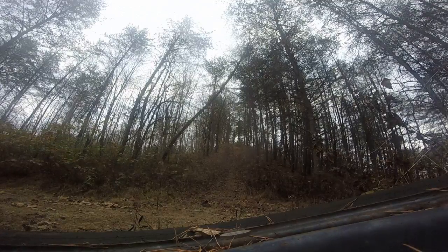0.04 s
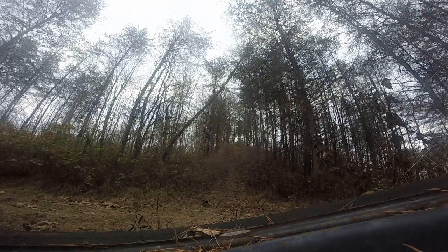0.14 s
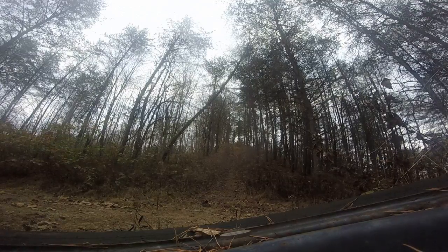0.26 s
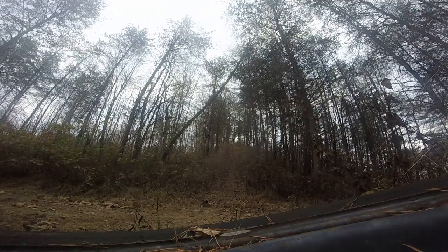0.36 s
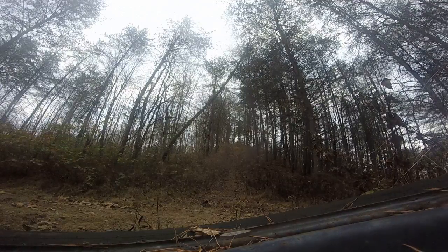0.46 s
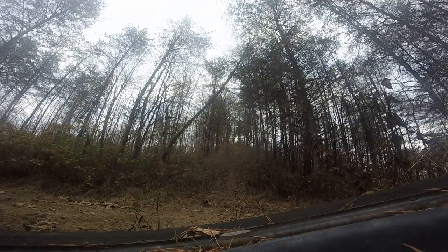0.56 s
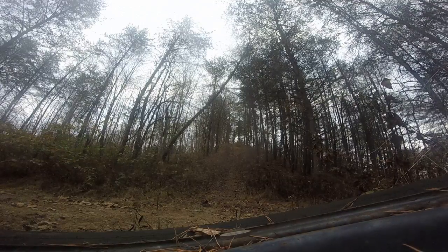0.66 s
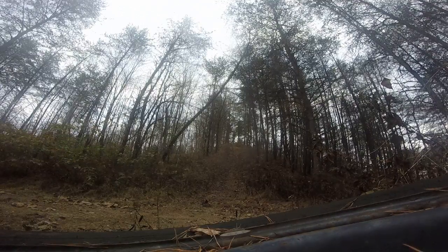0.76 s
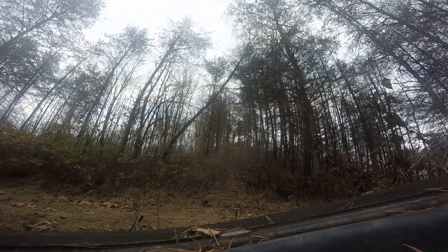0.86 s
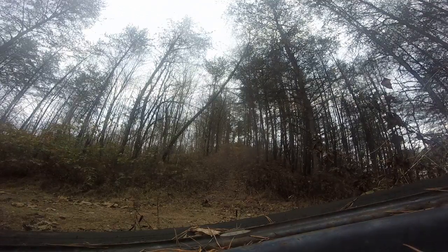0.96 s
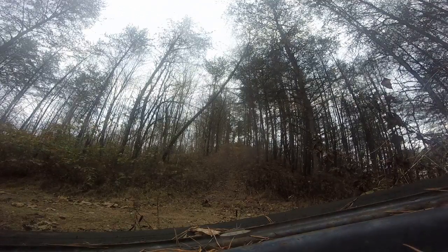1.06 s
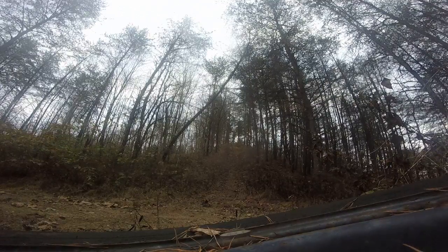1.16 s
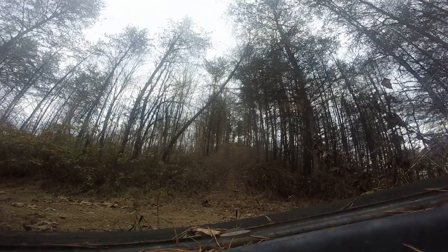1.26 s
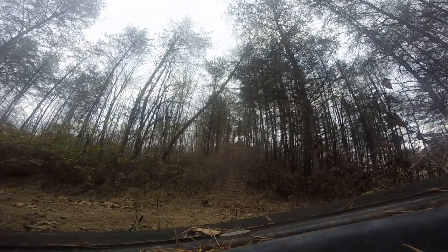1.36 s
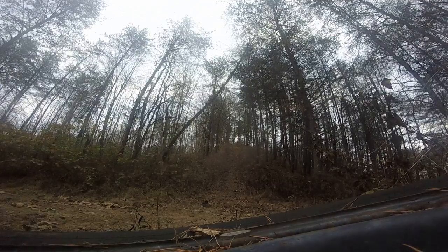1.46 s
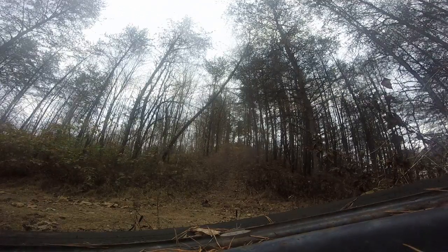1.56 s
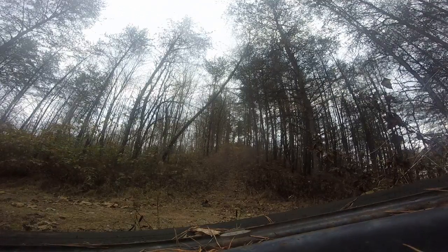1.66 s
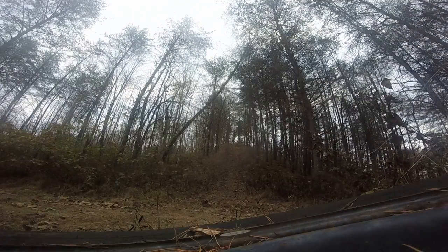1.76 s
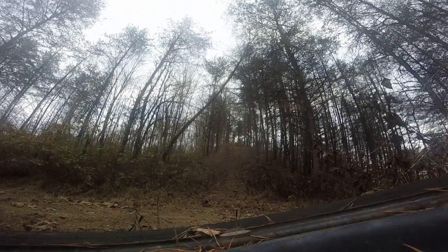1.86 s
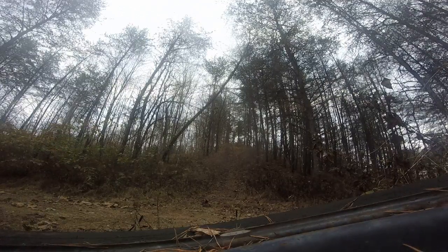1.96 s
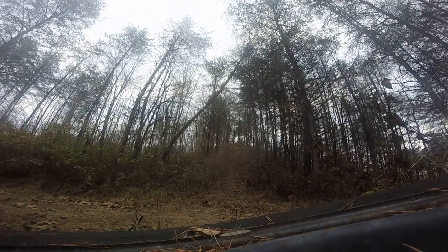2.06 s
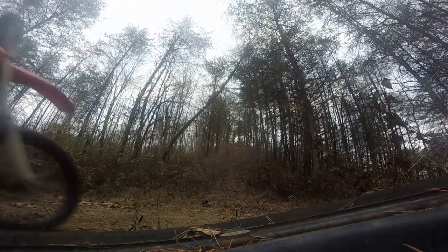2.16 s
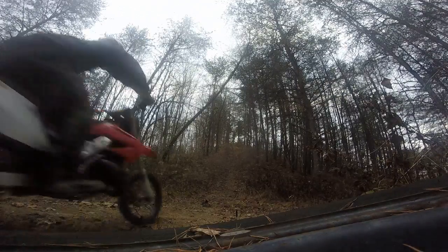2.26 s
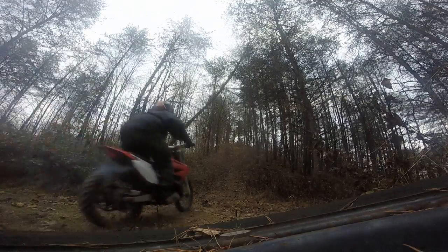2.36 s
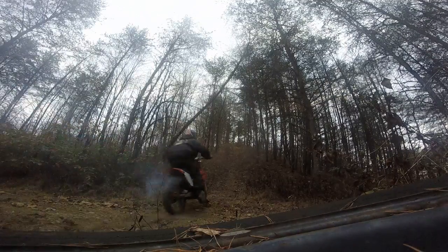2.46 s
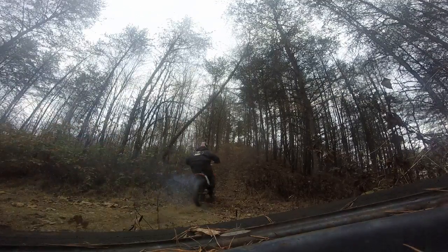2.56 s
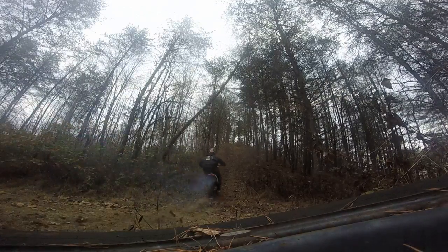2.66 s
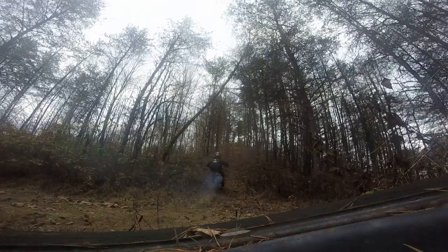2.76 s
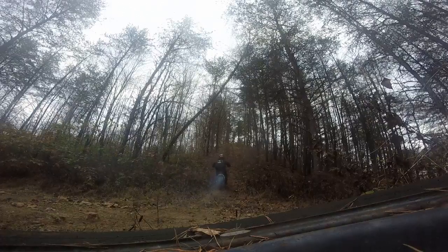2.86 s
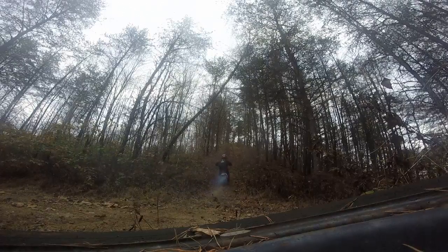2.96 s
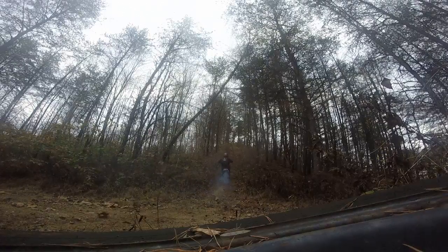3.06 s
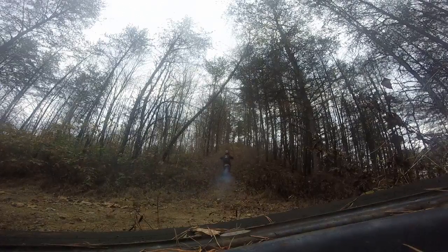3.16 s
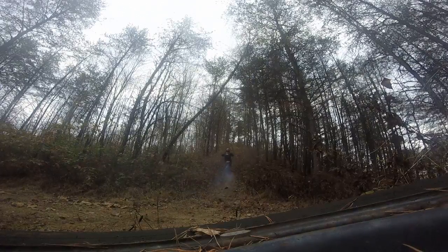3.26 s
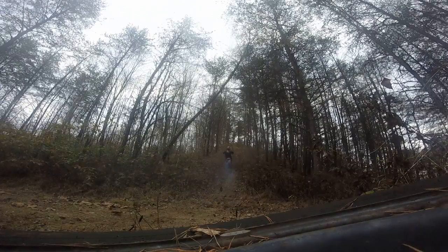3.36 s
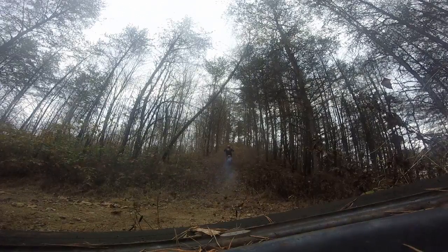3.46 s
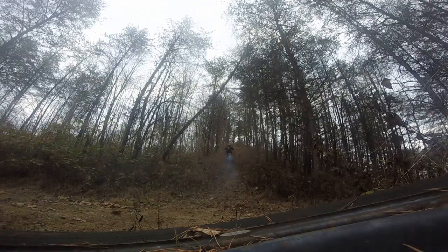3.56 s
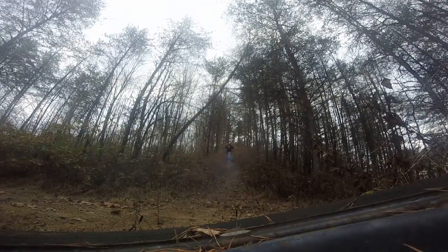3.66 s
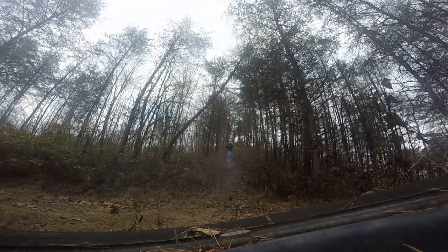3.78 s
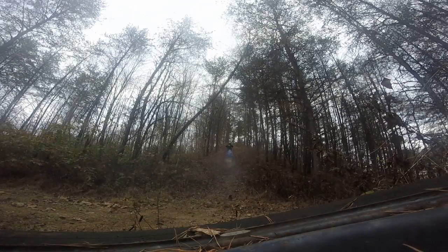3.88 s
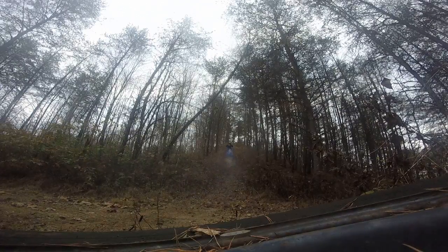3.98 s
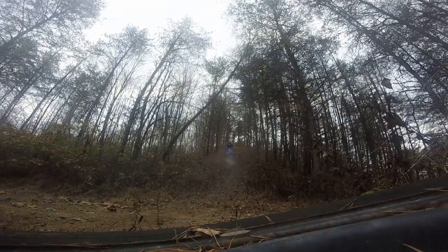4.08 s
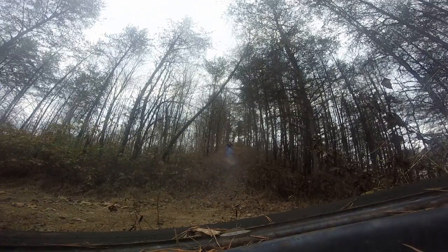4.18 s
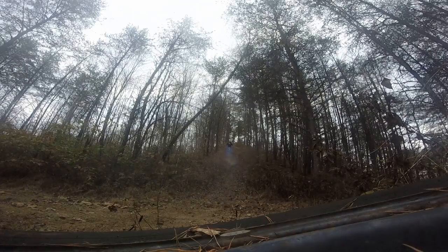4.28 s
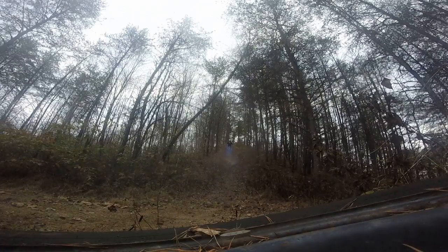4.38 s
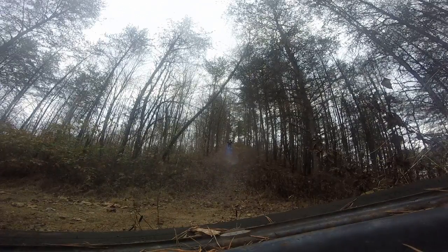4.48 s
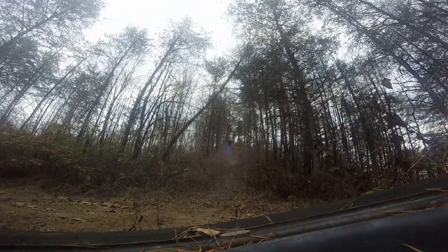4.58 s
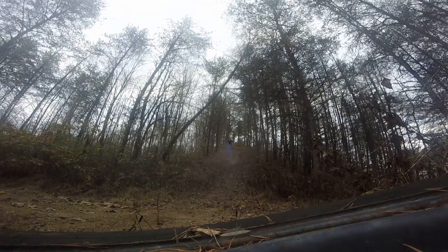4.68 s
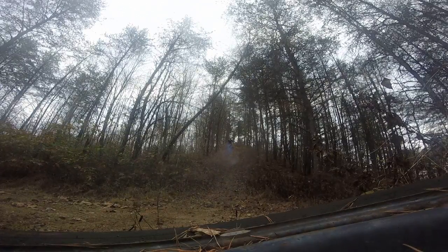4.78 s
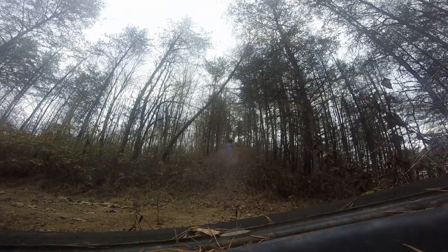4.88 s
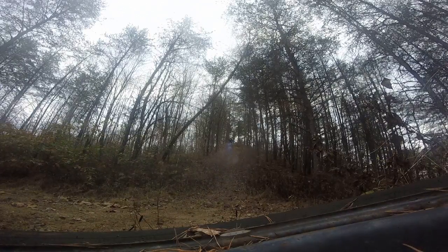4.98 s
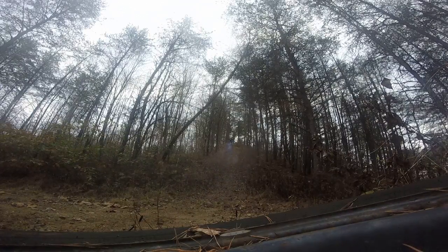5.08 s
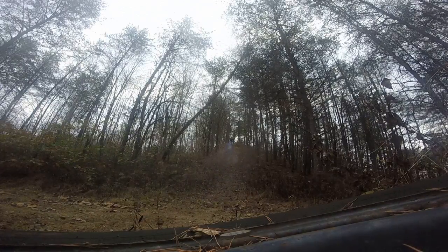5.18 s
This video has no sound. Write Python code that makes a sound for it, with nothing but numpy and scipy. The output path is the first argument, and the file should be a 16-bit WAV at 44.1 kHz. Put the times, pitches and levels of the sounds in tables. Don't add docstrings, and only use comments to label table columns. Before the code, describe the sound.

Faint engine buzz swells suddenly into a harsh, raspy dirt bike pass, then flickers between trees as it rides off, still screaming.

```python
import sys
import numpy as np
from scipy import signal
from scipy.fft import rfft, irfft, next_fast_len
from scipy.io import wavfile
from scipy.ndimage import uniform_filter1d, map_coordinates

SR = 44100
rng = np.random.default_rng(int(sys.argv[2]) if len(sys.argv) > 2 else 0)


def volts(x):
    e = np.asarray(x, float) / 20
    return 10 ** e


def transcribe(signal):
    frames = np.atleast_2d(signal).T
    limited = np.clip(frames, -1, 1)
    pcm = np.round(limited * 32767).astype(np.int16)
    wavfile.write(sys.argv[1], SR, pcm)


N = 230622

DRONE_HZ, RASP_HZ = 780, 2000
SLOPE_S = 3.1


def bike():
    # start_s, bark_db, hiss_db (gas hiss over the bark)
    loudness = [(0, -52, -17.5), (.25, -49, -16.5), (.64, -57, -12), (1.14, -48, -15), (1.53, -43.5, -11),
                (1.68, -37.5, -11), (1.72, -36, -4), (1.9, -27.5, -8), (2.09, -17, -17.5), (2.3, -17, -24),
                (2.355, -25, -17), (2.5, -22.5, -20), (2.72, -24.5, -24.5), (3.45, -28, -21.5),
                (3.77, -28, -21), (3.82, -33, -21.5), (4.75, -30, -23), (5.23, -33.5, -23)]
    # start_s, gas_share (0-1 of the bark), scatter_db (from trunks)
    roughness = [(0, .6, -4), (1.6, .5, -6), (2, .25, -9), (2.3, .22, -9), (2.45, .07, -16),
                 (2.8, .08, -15), (3.75, .14, -11), (3.9, .33, -2), (5.23, .36, -1)]
    # peak_s, length_s, lift_db
    bite = (2.372, .02, 5.5)
    # peak_s, length_s, lift_db
    shut = (2.348, .026, -4.5)
    # peak_s, length_s, lift_db
    gaps = [(2.17, 0.098, 2.5), (2.57, 0.073, 4), (2.674, 0.045, 0), (3.058, 0.011, 6), (3.194, 0.041, 3),
            (3.34, 0.24, 4), (3.463, 0.051, 3), (4.023, 0.029, 5), (4.098, 0.064, 3.5), (4.157, 0.066, 2.5),
            (4.34, 0.094, 3), (4.443, 0.016, 3.5), (4.576, 0.067, 1.5), (4.663, 0.13, 3),
            (4.772, 0.042, 1.5), (4.808, 0.042, 3), (1.933, 0.032, 3), (2.052, 0.024, 2),
            (2.247, 0.15, 2.5), (2.455, 0.017, 4.5), (2.62, 0.032, 1.5), (3.08, 0.022, 0),
            (3.686, 0.099, 1.5), (3.86, 0.046, 2), (3.96, 0.026, -0.5), (4.504, 0.023, 1.5),
            (4.894, 0.088, 3), (4.965, 0.024, 2), (5.072, 0.027, 1), (5.138, 0.035, 2), (5.04, 0.018, 1.5),
            (5.195, 0.055, 1.5), (4.26, 0.048, 1.5), (3.408, 0.017, 2), (3.95, 0.022, 3)]
    # centre_hz, width_hz, peak_s, length_s, lift_db
    slot = [
        (4760, 330, 2.6, 0.59, -4),
        (5700, 900, 2.55, 0.09, 3),
        (5700, 900, 2.66, .1, -2),
        (12500, 3000, 2.13, .1, 2),
        (12500, 4000, 2.28, .12, -3),
    ]

    near, rear, far = after(1.6, 0.14), after(2.35, .02), after(3.8, .02)
    bark_db, hiss_db = curves(loudness)
    bark_db = bark_db + glimpses([bite])
    gas_share, wet_db = curves(roughness)
    open_db, shut_db = glimpses(gaps), glimpses([shut])
    hiss_db = hiss_db + 7.5 * (after(2.055, 0.016) - rear) + shut_db

    turns = np.cumsum(revs()) / SR
    blows, gas = exhaust(turns, gas_share)
    blows = wood(echoes(blows), wet_db)
    low, high = housing(blows, gas, near, rear, far)
    body = drone(low, gas, rear, far) + bark(low, rear, open_db) * volts(open_db)
    treble = rasp(high, hiss_db + 0, rear, shut_db, open_db)
    treble = treble + hiss(gas + (0.37 + 0.35 * (rear - far)) * blows, hiss_db, open_db)
    engine = volts(bark_db) * (body + shade(treble, slot))
    return pipe_tone(turns) + whine(turns) + engine + wheels(bark_db)


def revs():
    # start_s, firing_hz
    speed = [(0, 98.4), (.2, 115), (.35, 106), (.72, 87), (.75, 81.5), (.86, 82.5), (1.19, 99.5),
             (1.32, 107), (1.58, 108.5), (1.8, 129), (2.52, 133), (3.2, 141), (3.31, 151), (3.62, 147),
             (3.79, 170), (3.85, 132), (4.57, 133), (4.7, 144)]
    # peak_s, slip_s, grip_s, extra_hz (below 0
    slips = [(1.272, 0.08, 0.05, 8), (1.45, 0.12, 0.12, 4), (1.626, 0.045, 0.1, 6.5),
             (1.717, 0.04, 0.09, 15.5), (1.857, 0.025, 0.025, -6.0), (1.886, 0.025, 0.09, 9.0),
             (2.016, 0.09, 0.04, -5.5), (2.096, 0.025, 0.06, 14.5), (2.226, 0.025, 0.025, 3.0),
             (2.325, 0.09, 0.04, 23.0), (2.495, 0.04, 0.025, 4.5), (2.525, 0.025, 0.025, -4.5),
             (2.565, 0.025, 0.09, 4.0), (2.665, 0.025, 0.025, -4.5), (2.705, 0.18, 0.09, 10.5),
             (2.755, 0.025, 0.025, 3.0), (2.794, 0.025, 0.025, -5.0), (2.864, 0.04, 0.04, 8.5),
             (2.904, 0.18, 0.18, 9.0), (3.034, 0.09, 0.025, 3.0), (3.054, 0.04, 0.04, 14.0),
             (3.124, 0.06, 0.025, -3.5), (3.154, 0.025, 0.025, 3.5), (3.363, 0.09, 0.025, 4.5),
             (3.413, 0.025, 0.025, 4.0), (3.433, 0.025, 0.025, -6.0), (3.473, 0.025, 0.13, 6.0),
             (3.473, 0.04, 0.025, 4.5), (3.583, 0.04, 0.025, 6.0), (3.613, 0.025, 0.025, -6.5),
             (3.692, 0.06, 0.09, 13.0), (3.762, 0.025, 0.04, 3.0), (3.852, 0.025, 0.025, -3.5),
             (3.892, 0.025, 0.13, 6.5), (3.992, 0.025, 0.025, 3.0), (4.062, 0.025, 0.025, -4.5),
             (4.111, 0.04, 0.04, 15.0), (4.201, 0.025, 0.18, 3.0), (4.361, 0.04, 0.025, 11.5),
             (4.411, 0.025, 0.025, -3.5), (4.441, 0.025, 0.13, 5.5), (4.511, 0.025, 0.04, 3.5),
             (4.61, 0.025, 0.025, 7.5), (4.71, 0.025, 0.04, 3.5), (4.75, 0.025, 0.06, -6.0),
             (4.83, 0.025, 0.06, 10.0), (4.93, 0.025, 0.04, -3.0), (4.989, 0.025, 0.09, 5.5),
             (5.159, 0.04, 0.04, -13.5)]
    t = np.arange(N) / SR
    hz = curves(speed)[0]
    for s, slip, grip, extra in slips:
        hz = hz + np.interp(t, (s - slip, s, s + grip), (0, extra, 0))
    return hz * (1 + .005 * walk(60))


def pipe_tone(turns):
    tone = 0
    for k, db in enumerate(partials()):
        delay = np.pi / 2 * k ** 2
        phase = 2 * np.pi * (k + 1) * turns + delay + .12 * (k + 1) * walk(70)
        tone = tone + np.sqrt(2) * volts(db + 1.3 * walk(90)) * np.sin(phase)
    return tone


def partials():
    # start_s, level_db, lean_db (firing rate over its octave, set by the ground bounce)
    tone = [(0, -47.5, -14), (.3, -48, -2.5), (.5, -58, -8), (.742, -63, 7), (.752, -48.5, -8),
            (1.1, -40.5, -22), (1.3, -39, -13), (1.65, -36.5, -7), (1.76, -37.5, 16), (2.02, -33.5, 3.5),
            (2.09, -27.5, 25), (2.33, -33.5, 3), (2.39, -33, -8), (2.62, -31.5, 0), (3.4, -31, 7),
            (3.74, -33.5, 9.5), (3.84, -39.5, 0.5), (5.23, -43.5, 8)]
    # start_s, third_db, fourth_db
    upper = [(0, -66, -66), (.3, -68, -65), (.7, -73, -73), (1.5, -59, -54), (1.75, -50.5, -56),
             (1.9, -46.5, -53.5), (2.0, -52, -46.5), (2.09, -34.5, -42.5), (2.22, -44, -34),
             (2.31, -41, -42), (2.38, -54, -48), (2.45, -52, -44), (2.6, -39, -41), (3.0, -38.5, -45),
             (3.3, -43.5, -45), (3.6, -49.5, -47.5), (3.76, -55, -43), (3.84, -61, -59), (3.95, -66, -49.5),
             (4.6, -64, -50.5), (5.23, -62, -54.5)]
    tone_db, lean_db = curves(tone)
    first = 1 / (1 + volts(-2 * lean_db))
    levels_db = [tone_db + 10 * np.log10(first), tone_db + 10 * np.log10(1 - first), *curves(upper)]
    return [db + depth * 1.5 * walk(22) for db, depth in zip(levels_db, (0.4, 0.8, 1.1, 1.3))]


def whine(turns):
    # multiple (of the firing rate), peak_s, length_s, level_db, waver_db
    lines = [(9, 0.18, 0.26, -52, 3), (5, 2.21, 0.11, -31.5, 4.5), (6, 4.76, 0.57, -41.5, 2),
             (4, 1.2, 0.72, -57, 3), (7, 2.0, 0.27, -28, -0.5), (8, 2.22, 0.12, -17, -1),
             (11, 2.2, 0.064, -22, -1), (13, 2.235, .07, -21, 2), (10, 2.095, .05, -16, 0),
             (6, 2.3, 0.052, -23, -3), (9, 2.7, 0.076, -25, 2), (11, 2.63, 0.12, -29, 2),
             (9, 2.59, 0.053, -36, 1), (8, 3.055, 0.033, -17.5, 2), (8, 3.33, 0.13, -28, -2),
             (9, 3.33, 0.049, -31, 1), (7, 3.75, 0.064, -32, 4), (7, 3.55, 0.084, -35, -1),
             (6, 3.55, 0.087, -34, 2), (3, 0.777, 0.074, -51, 1), (5, 0.99, 0.52, -60, 2),
             (6, 2.7, .14, -41, 2), (7, 2.6, .09, -36, 5), (5, 4.23, 0.75, -47, 3), (5, 1.45, .3, -59.5, 6),
             (6, 1.45, .2, -57, 5.5), (7, 2.22, 0.11, -24, 3.5), (8, 2.11, 0.037, -20, 2),
             (6, 4.12, 0.11, -41, 3), (5, 3.45, .35, -43.5, 0)]
    t, out = np.arange(N) / SR, 0
    for multiple, s, length, db, waver_db in lines:
        swell = np.exp(-(2 * (t - s) / length) ** 4)
        out = out + volts(db + waver_db * walk(40)) * swell * np.sin(2 * np.pi * np.round(multiple) * turns)
    return out


def firings(turns, at, chance, jitter_s, scatter_db):
    count = int(turns[-1] - 1)
    when = np.interp(np.arange(count) + at, turns, np.arange(N)) + jitter_s * SR * chance[:count, 0]
    when = np.clip(when, 0, N - 2)
    whole = when.astype(int)
    size = volts(scatter_db * chance[:count, 1])
    out = np.zeros(N)
    np.add.at(out, whole, size * (1 - when + whole))
    np.add.at(out, whole + 1, size * (when - whole))
    return out


def exhaust(turns, gas_share):
    chance = rng.standard_normal((N // 200, 4))
    clicks = firings(turns, .3, chance[:, :2], .00003, 1.8)
    clicks = clicks + volts(-6.5) * firings(turns, .73, chance[:, 2:], .00005, 2.5)
    puff = 4.6 + np.exp(-((turns - .3) % 1) / 2.2)
    gas = level(puff * volts(1.37 * walk(60)) * rng.standard_normal(N), 0)
    return np.sqrt(1 - gas_share) * level(clicks, 0) + np.sqrt(gas_share) * gas, gas


def echoes(x):
    # delay_ms, drift_ms, level_db
    paths = [
        (1.3, .1, -14),
        (4.1, .15, -13),
        (9.5, .25, -13),
    ]
    n = np.arange(N)
    out = x
    for ms, drift, db in paths:
        late = n - (ms + drift * walk(13)) * SR / 1000
        out = out + volts(db) * map_coordinates(x, [late], order=3)
    return out


def wood(x, wet_db):
    t = np.arange(SR // 2) / SR
    trunks = rng.random((2, len(t))) < .02
    fade = volts(-60 * t / .5) * (t > .012)
    sets = rng.standard_normal((2, len(t))) * trunks * fade
    turn = 1.77 * walk(22)
    scatter = np.cos(turn) * signal.fftconvolve(x, sets[0])[:N]
    scatter = scatter + np.sin(turn) * signal.fftconvolve(x, sets[1])[:N]
    return x + volts(wet_db) * scatter * x.std() / scatter.std()


def housing(blows, gas, near, rear, far):
    # pitch_hz, level_db (per Hz)
    distant = [(350, -43), (600, -18), (800, 3), (895, 7.5), (1160, 5.5), (1440, -2), (1840, -0.5),
               (2030, -5.5), (2190, -8), (3450, -12), (4800, -25), (6240, -27), (10600, -120)]
    # pitch_hz, level_db (per Hz)
    front = [(350, -73.5), (600, 0), (655, 4), (727, -3.5), (911, 6.5), (1070, 5), (1250, -4.5), (1730, -6),
             (2030, -9.5), (2520, -11), (2750, -13.5), (3480, -13), (4800, -31.5), (6240, -62),
             (10600, -120)]
    # pitch_hz, level_db (per Hz)
    back = [(350, -42), (600, -18), (720, -15.5), (880, 8.5), (968, -15.5), (1270, 3.5), (1380, -0.5),
            (1590, -1.5), (1940, -11.5), (2140, -14), (2410, -23.5), (3730, -19.5), (4800, -37.5),
            (6240, -62.5), (10600, -120)]
    # centre_hz, width_hz, lift_db
    distant_rings = [(856, 57, 2.9), (1460, 180, 1.1), (2116, 110, 9.1), (2560, 95, 4), (2960, 240, 7),
                     (3480, 115, 7.6), (4070, 140, 3.6)]
    # centre_hz, width_hz, lift_db
    front_rings = [(900, 140, 4), (1070, 90, 4), (1440, 100, 4), (1750, 160, 4), (2590, 200, 5),
                   (3050, 220, 6), (3410, 180, 6), (4150, 200, 5),
                   (959, 63, -12), (1822, 120, 7.5), (2070, 160, -8), (2380, 90, -8), (2740, 210, -5.5),
               (3230, 200, -12), (3820, 120, -10)]
    # centre_hz, width_hz, lift_db
    back_rings = [(870, 130, 2), (1088, 133, 19), (1258, 98, 3), (1600, 240, 1), (2138, 200, 10),
                  (2730, 600, 10.5), (4170, 250, 6.5), (3690, 270, 2.5), (3340, 200, -0.5), (4780, 300, -1)]
    # centre_hz, width_hz, lift_db
    far_rings = [(880, 90, -2), (1270, 120, 5), (1100, 90, -5), (2130, 100, 2)]

    poses = ((distant, distant_rings, 1 - near), (front, front_rings, near - rear),
             (back, back_rings, rear - far), (back, back_rings + far_rings, far))
    low, high = 0, 0
    for points, rings, share in poses:
        weight = np.sqrt(np.clip(share, 0, 1))
        low = low + weight * level(colour(blows, points, rings), 0)
        high = high + weight * band(colour(blows + .75 * gas, points, rings), RASP_HZ, "high")
    return low, high


def drone(low, gas, rear, far):
    # peak_s, length_s, lift_db
    dips = [
        (3.76, .16, -8),
        (2.77, 0.27, -6),
        (2.05, .15, -2),
    ]
    drone_db = -22.5 - 9.5 * rear + 13 * after(SLOPE_S, 0.15) + glimpses(dips)
    wash_db = -30 + 6.5 * (after(SLOPE_S, 0.086) - far)
    hum = steady(band(low, (600, DRONE_HZ - 20), "band"), 0.0099) * volts(drone_db)
    return hum + band(gas, (330, DRONE_HZ), "band") * volts(wash_db)


def bark(low, rear, open_db):
    # start_s, tilt_db
    balance = [(0, 1.5), (1.1, 7.5), (1.55, 2.5), (1.81, 1.5), (1.96, 4), (2.09, 5.5), (2.33, 0), (2.48, 4.5),
               (2.62, 1), (2.85, 5), (3.0, 15.5), (3.36, -5.5), (3.67, -1.5), (4.25, 4.5), (4.53, 3.5),
               (4.67, -5), (5.0, -3.5), (5.23, 4)]
    # centre_hz, width_hz, peak_s, length_s, lift_db
    shades = [(860, 85, 3.75, 0.15, -10), (1090, 110, 3.52, 0.42, -8), (1800, 130, 1.97, .12, -6),
              (1250, 110, 3.4, 0.29, 4.5), (1570, 210, 2.67, 0.18, 6.5), (1080, 200, 4.15, 0.35, -1),
              (1080, 160, 2.93, 0.23, 1.5), (1130, 160, 1.93, 0.35, -2.5), (910, 130, 1.91, 0.3, 4),
              (1090, 180, 4.7, 0.34, 5.5), (1850, 120, 2.2, .1, -5), (1670, 120, 2.1, .08, -2),
              (1200, 120, 2.22, .14, -2.5), (870, 120, 3.42, .14, -3.5), (1770, 190, 2.8, 0.13, -4)]
    tilt_db, tilt_hz = curves(balance)[0], 1410
    middle = shade(band(mirror(low, rear), (DRONE_HZ, RASP_HZ), "band"), shades)
    dull = signal.sosfilt(signal.butter(4, tilt_hz, fs=SR, output="sos"), middle)
    bright = signal.sosfilt(signal.butter(4, tilt_hz, "high", fs=SR, output="sos"), middle)
    tilted = steady(dull * volts(-tilt_db) + bright * volts(tilt_db), .05)
    return flicker(tilted, open_db) * volts(1.1 * walk(35))


def mirror(x, rear):
    t = np.arange(N) / SR
    lag_ms = .39 / np.maximum(t - 2.0, .3)
    copy = map_coordinates(x, [(t - lag_ms / 1000) * SR], order=3)
    return x + volts(-5.5) * np.clip(rear - after(2.85, .07), 0, 1) * copy


def flicker(x, open_db):
    # centre_hz, width_hz, chance_db, rate_hz, start_s, glimpse_share (extra), hidden_db
    settings = (1265, 240, 1.2, 48, 3.25, 1.3, .5)
    blinks = [3.39, 3.44, 3.5, 3.985, 4.06, 4.12, 4.205, 4.32, 4.41, 4.48, 4.54, 4.61, 4.72, 4.79, 4.865,
              4.925, 5.0, 5.06, 5.11]
    hz, width, depth_db, rate, s, share, hidden_db = settings
    ring = ring_of(x, hz, width)
    on = after(s, 0.12)
    even = steady(ring, .02) * ring.std()
    blink_db = glimpses((b, .028, -7) for b in blinks)
    ring_db = depth_db * walk(rate) + share * open_db + hidden_db + blink_db
    return x - on * ring + on * (0.31 * ring + 0.69 * even) * volts(ring_db)


def rasp(high, hiss_db, rear, shut_db, open_db):
    # centre_hz, width_hz, peak_s, length_s, lift_db
    rasp_shades = [
        (3500, 350, 2, 0.34, 4),
        (3550, 740, 2.46, 0.16, 5),
        (2400, 560, 2.45, 0.43, -4.5),
        (3100, 900, 3.6, 0.28, -1),
        (2150, 250, 2.32, 0.33, 2),
        (3000, 2000, 3.83, 0.042, 1),
        (2120, 150, 4.65, 0.12, 3),
        (3000, 270, 2.72, 0.23, 2),
        (3030, 310, 2.21, 0.11, 4),
    ]
    rasp_db = 2.5 - 4.5 * rear + 0.36 * hiss_db + 5 * after(2.92, 0.27) + shut_db
    return shade(steady(high, 0.044), rasp_shades) * volts(rasp_db + 0.45 * walk(13) + 0.45 * open_db)


def hiss(x, hiss_db, open_db):
    # pitch_hz, level_db (per Hz)
    far_behind = [(2590, -40), (4400, -17), (5220, -1), (6120, -3), (6820, 1), (7220, -4), (7960, -4),
                  (9790, -16), (12000, -31), (14400, -38), (15100, -44)]
    # pitch_hz, level_db (per Hz)
    from_behind = [(2590, -55), (4400, -21), (4630, -8), (5190, -1.5), (6120, -13.5), (6610, 2),
                   (6960, 5.5), (7410, -4), (7960, -1.5), (9100, -7.5), (10100, -14), (12800, -18.5),
                   (15100, -28)]
    # pitch_hz, level_db (per Hz)
    from_beside = [(2820, -1), (4800, -22), (5180, 3), (5620, -6), (6010, 2.5), (6620, 2), (7080, -1.5),
                   (7600, -2), (8050, 2), (9120, -5), (9710, -10.5), (12800, -13.5), (15100, -21)]
    # pitch_hz, level_db (per Hz)
    from_ahead = [(2820, -28), (4800, -16), (5210, -8), (5760, -3), (6400, -11), (7420, -17.5), (8210, -17),
                  (9120, -16.5), (9620, -30), (10600, -22), (11900, -25), (12600, -30), (15100, -38)]
    # pitch_hz, level_db (per Hz)
    from_far = [(2820, -35), (4800, 0.5), (5790, 4), (6750, 3.5), (7750, -0.5), (8610, 4.5), (9210, -1.5),
                (9710, -11.5), (10300, -7.5), (12100, -15), (13300, -13.5), (15100, -25)]
    # peak_s, length_s, lift_db
    spit = [
        (2.3, 0.1, 4),
        (2.43, 0.086, -1),
        (3.83, .06, 4.5),
        (2.14, 0.13, 2),
        (2.29, 0.073, -1),
        (3.32, .08, 3),
        (1.73, .05, 0.5),
        (1.85, 0.028, -5),
    ]
    behind, beside, ahead, far = after(0.81, 0.13), after(2.04, 0.04), after(2.36, 0.036), after(2.66, 0.03)
    poses = ((far_behind, 1 - behind), (from_behind, behind - beside), (from_beside, beside - ahead),
             (from_ahead, ahead - far), (from_far, far))
    air = 0
    for points, share in poses:
        air = air + np.sqrt(np.clip(share, 0, 1)) * band(colour(x, points), 4600, "high")
    return air * volts(hiss_db + glimpses(spit) + 0.14 * walk(24.2) + 0.43 * open_db)


def wheels(bark_db):
    return band(rng.standard_normal(N), (130, 320), "band") * volts(0.58 * bark_db - 34.0)


def grit():
    # start_s, peak_db
    ticks = [
        (1.6236, -52),
        (1.7074, -45),
        (1.8805, -38),
        (2.3614, -41),
        (2.4362, -43),
        (4.5494, -57),
    ]
    t, out = np.arange(SR // 200) / SR, np.zeros(N + SR)
    for (s, db), noise in zip(ticks, rng.standard_normal((60, len(t)))):
        start = int(s * SR)
        out[start:start + len(t)] += volts(db - 3) * noise * np.exp(-t / .0007)
    return signal.sosfilt(signal.butter(4, 9000, "high", fs=SR, output="sos"), out[:N])


def thud():
    # peak_s, length_s, level_db
    shake = (2.48, 0.47, -55)
    s, length, db = shake
    swell = np.exp(-(2 * (np.arange(N) / SR - s) / length) ** 4)
    return band(rng.standard_normal(N), (62, 100), "band") * volts(db) * swell


def rumble():
    # pitch_hz, level_db (per Hz)
    wind = [(15, -43), (28, -3), (45, -2), (100, -4.5), (250, -12), (700, -14), (2000, -37), (12500, -44),
            (15000, -52)]
    return level(colour(rng.standard_normal(N), wind) * volts(0.23 * walk(0.64)), -54.5)


def level(x, db):
    return x * volts(db) / np.sqrt(np.mean(x ** 2))


def curves(table):
    s, *columns = np.transpose(table)
    return [np.interp(np.arange(N) / SR, s, c) for c in columns]


def after(s, turn_s):
    return .5 + .5 * np.tanh((np.arange(N) / SR - s) / turn_s)


def glimpses(rows):
    t = np.arange(N) / SR
    return sum(db * np.exp(-(2 * (t - s) / length) ** 2) for s, length, db in rows)


def walk(rate):
    k = int(SR / rate)
    x = np.repeat(rng.standard_normal(N // 50)[:N // k + 1], k)
    x = uniform_filter1d(uniform_filter1d(x, k), k)[:N]
    return x / x.std()


def colour(x, points, rings=()):
    size = next_fast_len(N + SR // 4)
    hz = np.maximum(np.fft.rfftfreq(size, 1 / SR), 1)
    points_hz, points_db = np.transpose(points)
    db = np.interp(np.log(hz), np.log(points_hz), points_db)
    for f, w, lift_db in rings:
        db = db + lift_db / (1 + (2 * (hz - f) / w) ** 2)
    cepstrum = irfft(np.log(volts(db)), size)
    cepstrum[1:size // 2] *= 2
    cepstrum[size // 2 + 1:] = 0
    return irfft(rfft(x, size) * np.exp(rfft(cepstrum)), size)[:N]


def band(x, hz, kind):
    return level(signal.sosfilt(signal.butter(7, hz, kind, fs=SR, output="sos"), x), 0)


def ring_of(x, hz, width):
    edges = (hz - width / 2, hz + width / 2)
    return signal.sosfiltfilt(signal.butter(2, edges, "band", fs=SR, output="sos"), x)


def shade(x, rows):
    for hz, width, s, length, db in rows:
        x = x + ring_of(x, hz, width) * (volts(glimpses([(s, length, db)])) - 1)
    return x


def steady(x, span_s):
    k = int(span_s * SR)
    return x / np.sqrt(uniform_filter1d(uniform_filter1d(x ** 2, k), k) + 1e-9)


def scene():
    return (bike() + grit() + thud() + rumble())[None]


def band_limit(x):
    return signal.sosfilt(signal.butter(12, 15240, fs=SR, output="sos"), x)


def record(dry):
    return band_limit(np.tanh(dry / 0.95))


dry = scene()
out = record(dry)
transcribe(out)
```